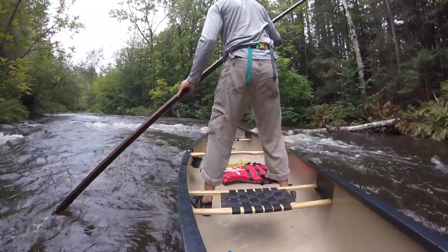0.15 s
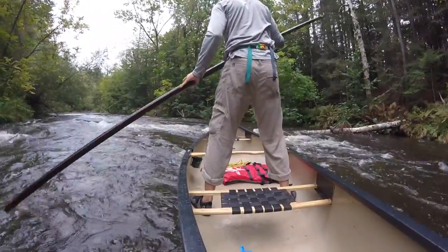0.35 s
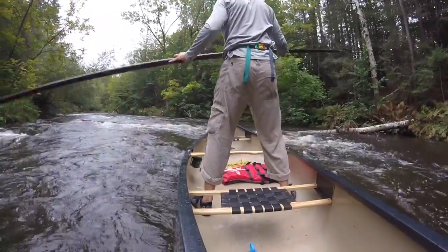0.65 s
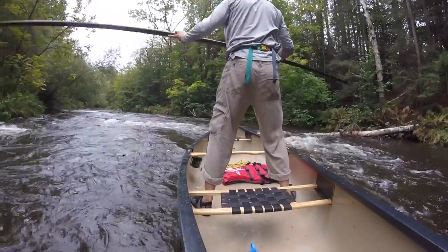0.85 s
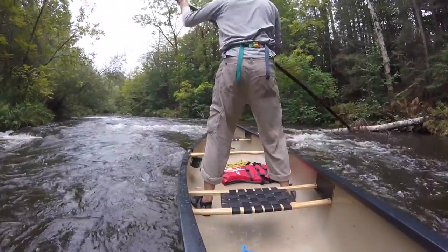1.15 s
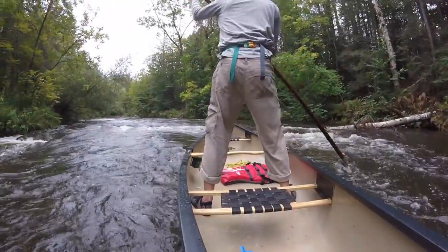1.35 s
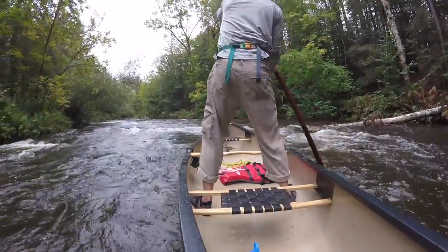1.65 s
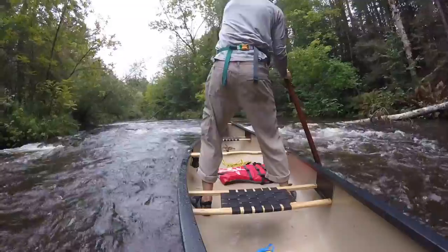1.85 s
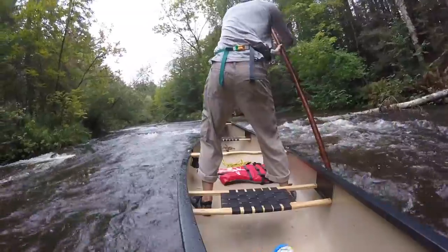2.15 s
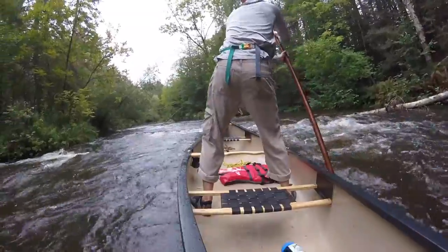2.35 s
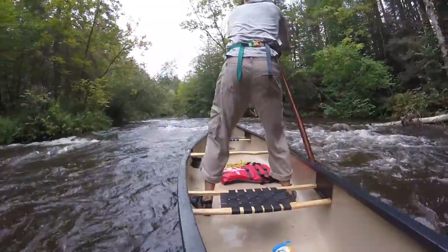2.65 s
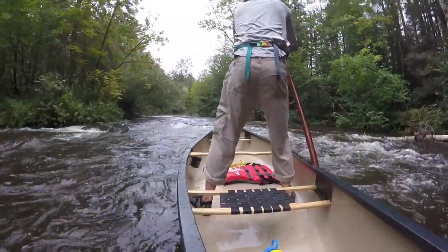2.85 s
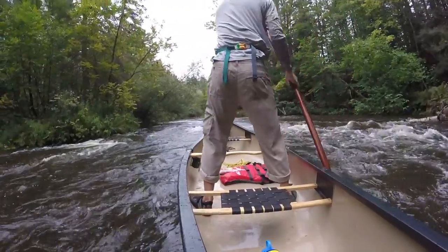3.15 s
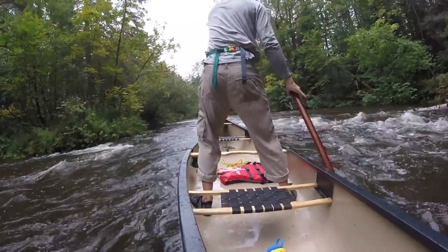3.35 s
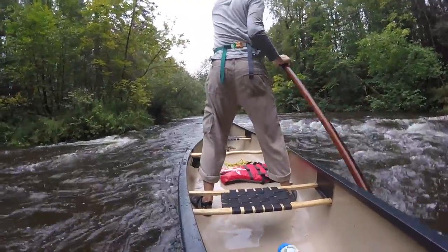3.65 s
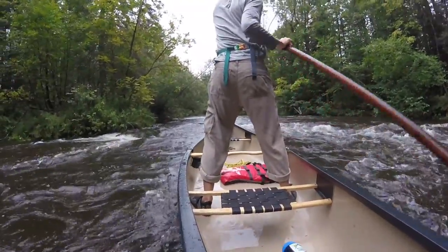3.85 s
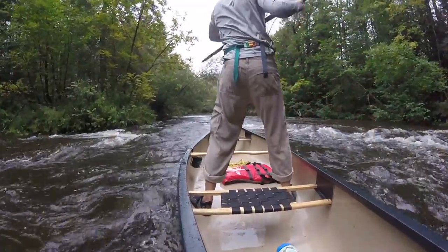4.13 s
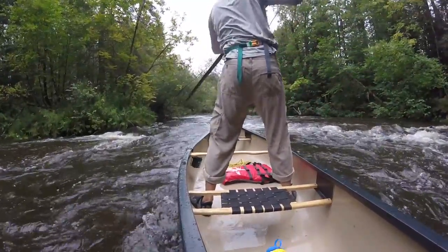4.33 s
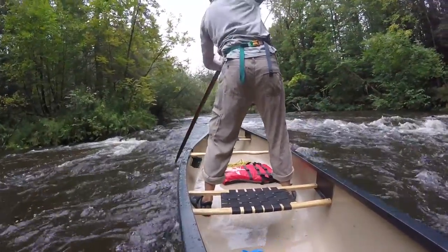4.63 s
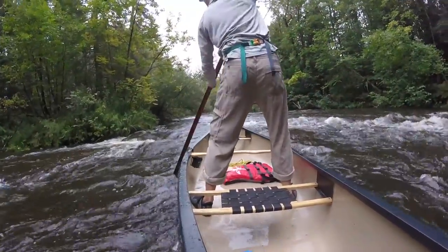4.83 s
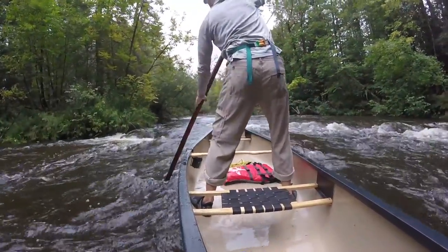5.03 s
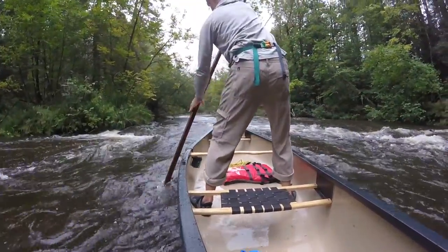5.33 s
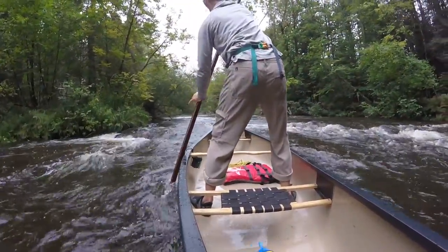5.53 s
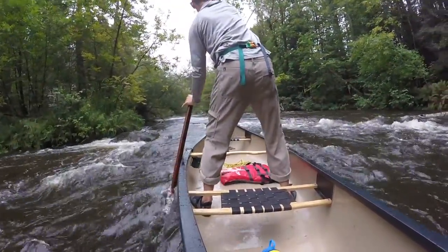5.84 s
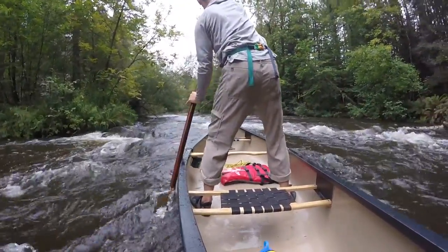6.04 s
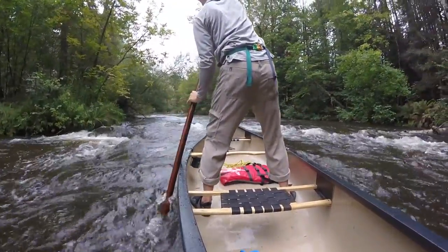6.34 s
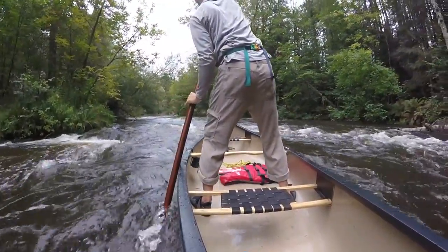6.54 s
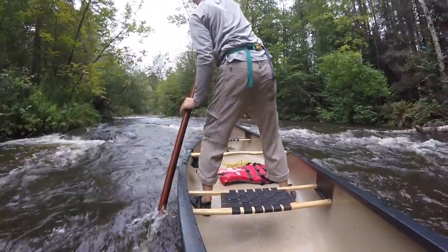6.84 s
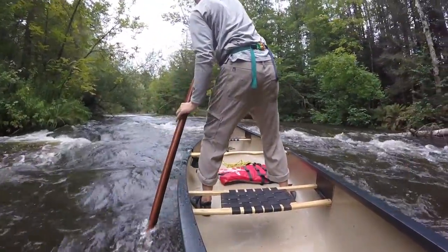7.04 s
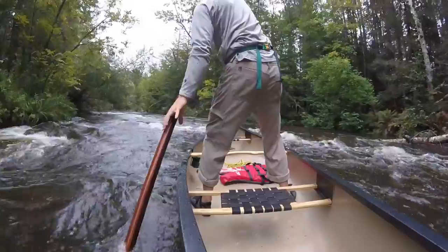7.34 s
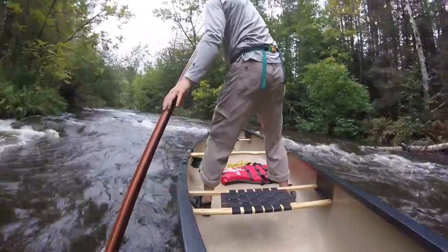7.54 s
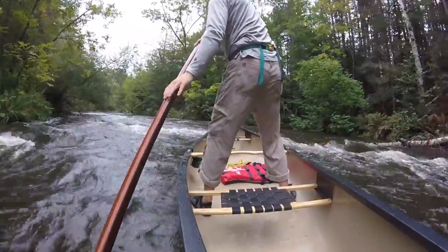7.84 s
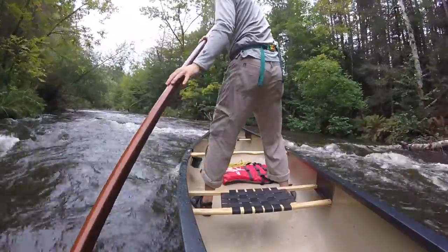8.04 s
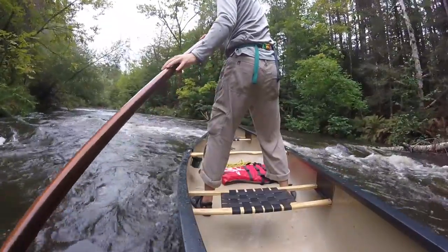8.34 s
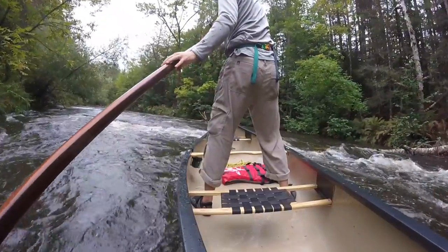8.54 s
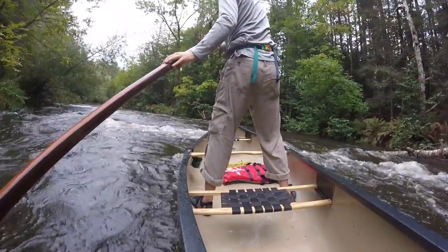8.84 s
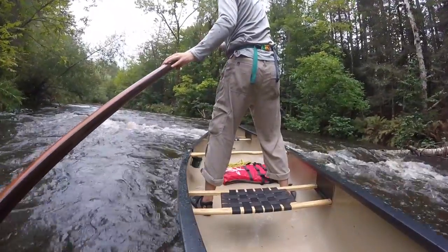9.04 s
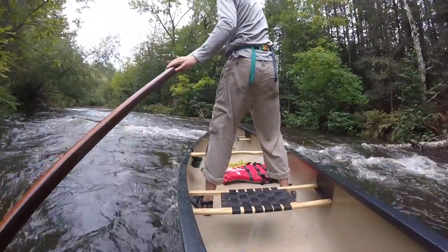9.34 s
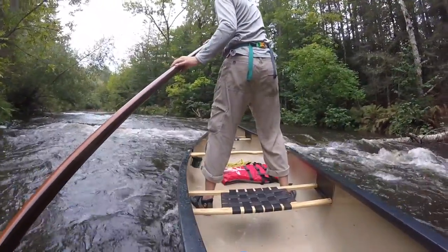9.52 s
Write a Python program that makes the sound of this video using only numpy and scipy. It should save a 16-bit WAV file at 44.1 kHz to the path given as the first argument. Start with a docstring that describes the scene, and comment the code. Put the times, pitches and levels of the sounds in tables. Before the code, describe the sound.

A close, muffled sound from a cased microphone mounted on a canoe in small rapids. Throughout, white water churns with midrange gurgle and fizzy spray, over a low wavering shudder, wind rumble and soft hull drumming. From 0 to 2 s there are drips and gentle wave slaps, with a dull boom near 1.3. At 2.0 the pole gives a hollow wooden tock, then scrapes at 2.3. At 2.7 a loud hull slam rings and bumps on with clacks. Another bang comes at 3.4, a smaller one at 3.6 with a deep air thump. The heaviest booming thud lands at 4.8, followed by lesser bumps at 5.2, 5.6, 6.0 and 6.4, with a few gulps and a knock at 6.1. Slaps, faint knocks and scrapes follow around 6.8 to 7.5. From 7.9 to 9.7 the rush swells again, with gulping bubbles, drips and wash slapping the side.

```python
"""Canoe poled up small rapids

Heard from inside a waterproof case fixed to the boat. Filtered noise and bubble swarms make the water;
damped modes make the hull slams, rebounds and pole knocks, scrapes and clacks. Waves slap, air gulps,
drops patter, noise rumbles as wind and a wavering low sine is the shaking mount.
A peak limiter ducks the river after hard slams."""
import sys
import numpy as np
from scipy import signal
from scipy.fft import rfft, irfft, next_fast_len
from scipy.io import wavfile
from scipy.ndimage import uniform_filter1d, minimum_filter1d

SR = 44100
rng = np.random.default_rng(int(sys.argv[2]) if len(sys.argv) > 2 else 0)


def waveform_to_disk(signal):
    """Save audio, clipped to [-1, 1], as 16-bit WAV at the path in sys.argv[1]."""
    frames = np.transpose(np.atleast_2d(signal))
    scaled = np.clip(frames, -1, 1) * 32767
    samples = np.round(scaled).astype(np.int16)
    wavfile.write(sys.argv[1], SR, samples)


N = 426888
TIME = np.arange(N) / SR


def amp(db):
    """Decibels to gain."""
    return 10 ** (np.asarray(db) / 20)


def unit(x):
    """Scales to rms 1."""
    return x / np.sqrt(np.mean(x ** 2) + 1e-20)


def peaked(x):
    """Scales to peak 1."""
    return x / (abs(x).max() + 1e-20)


def follow(rows, axis):
    """One dB column of a curve as a gain for every sample."""
    columns = np.transpose(rows)
    return amp(np.interp(TIME, columns[0], columns[axis]))


def colour(x, points):
    """Filters by a spectrum of (f/Hz, level/dB) points; beyond its ends it falls 20 dB per octave."""
    size = next_fast_len(len(x) + 4096)
    octave = np.log2(np.fft.rfftfreq(size, 1 / SR) + 1)
    hz, db = np.transpose(points)
    outside = abs(octave - np.clip(octave, np.log2(hz[0]), np.log2(hz[-1])))
    gain = amp(np.interp(octave, np.log2(hz), db) - 20 * outside)
    return irfft(rfft(x, size) * gain, size)[:len(x)]


def drift(per_s):
    """Smooth random curve of rms 1 that changes about per_s times a second."""
    hz = np.fft.rfftfreq(N // 64, 64 / SR)
    slow = irfft(rfft(rng.standard_normal(N // 64)) / (1 + (hz / per_s) ** 2))
    return unit(np.interp(TIME, np.linspace(0, TIME[-1], len(slow)), slow))


def add(mix, s, sound):
    """Mixes a sound in at time s."""
    part = mix[max(round(s * SR), 0):][:len(sound)]
    part += sound[:len(part)]


def swell(t, rise_s):
    """Rises to 1 in rise_s and dies away more slowly."""
    return t / rise_s * np.exp(1 - t / rise_s)


def patchy(patch_db, size):
    """Noise that swells in random patches of time and pitch, size = (bins, frames)."""
    z = signal.stft(rng.standard_normal(N), nperseg=512)[2]
    field = uniform_filter1d(rng.standard_normal(z.shape), size[0], axis=0)
    field = uniform_filter1d(field, size[1], axis=1)
    return unit(signal.istft(z * amp(patch_db * unit(field)), nperseg=512)[1][:N])


def bubble(hz, cycles, rise):
    """A bubble rings, decaying to 1/e in some cycles, rising in pitch as it nears the surface."""
    age = np.arange(int(5 * cycles * SR / hz) + 2) * hz / (SR * cycles)
    tone = np.sin(2 * np.pi * cycles * age * (1 + rise * age))
    return tone * np.exp(-age) * (1 - np.exp(-10 * age))


def bubbles(low_hz, high_hz, per_s, cycles, spread_db, count):
    """A swarm of bubbles of count sizes; most are faint, a few are loud."""
    out = np.zeros(N)
    for hz in np.linspace(low_hz, high_hz, count):
        blip = bubble(hz, cycles, 0.018)
        births = rng.random((4000, 2))[:int(per_s * TIME[-1] / count)]
        level_db = spread_db * np.minimum(-np.log(births[:, 1] + 1e-9), 4.5)
        sizes = amp(level_db) / np.linalg.norm(blip)
        places = (births[:, :1] * N).astype(int) + np.arange(len(blip))
        out += np.bincount(places.ravel(), (sizes[:, None] * blip).ravel(), N)[:N]
    return unit(out)


# hull modes before blow weighting and damping: f/Hz, level/dB, t60/s
HULL_MODES = [(131.8, -1, 0.72), (157.2, 8, 0.28), (187, 0.5, 0.64), (280, -30, 0.11), (298.7, -10, 0.16),
              (324.2, -3, 0.11), (357.4, 2, 0.079), (404, -7.5, 0.028), (475, -18.5, 0.029),
              (519, -6, 0.11), (636, -14, 0.092), (771, -11, 0.041), (920, -16.5, 0.039)]


def ring(modes, bright_hz, width):
    """The modes of a struck body; a blow favours those within about width octaves of its brightness."""
    t = np.arange(SR // 2) / SR
    out = np.zeros(len(t))
    for hz, db, t60 in modes:
        share = 1 / (1 + (np.log2(hz / bright_hz) / width) ** 2)
        build = 1 - np.exp(-t * hz / 1.2)  # about a cycle to build: low modes speak last
        out += share * build * amp(db - 60 * t / t60) * np.sin(2 * np.pi * hz * t)
    return out


def crack(t):
    """The brief gritty noise at the point of contact."""
    spectrum = [(300, -3.5), (700, 8), (1300, -9.0), (2000, -16.5),
                (2900, -11.5), (3700, -20.5), (5000, -12.0), (7000, -37.0)]
    grit = unit(colour(rng.standard_normal(len(t)), spectrum))
    return grit * np.exp(-t / 0.021) * (1 - np.exp(-t / 0.00097))


# white water, before trims: t/s, churn level/dB, spray level/dB
RIVER_LEVELS = [(0, -39.5, -49), (.45, -40, -48), (1.1, -40.5, -50), (1.55, -42, -46.5), (1.92, -39, -43.5),
                (2.4, -42.5, -49), (2.62, -37.5, -44), (3.15, -43, -50), (3.34, -38, -45.5),
                (4.0, -44.5, -50), (4.7, -41.5, -49.5), (5.5, -44.5, -53), (6.25, -43, -53.5),
                (7.25, -40, -49.5), (7.95, -38.5, -44), (8.45, -38, -46.5), (8.85, -36.5, -43.5),
                (9.68, -39.5, -48)]
# wash along the side: t/s, level/dB
WASH_LEVELS = [(0, -59), (2.9, -61.5), (3.33, -49.5), (3.5, -70), (7.5, -65), (7.95, -50), (8.4, -64),
               (8.75, -55), (9.08, -46.5), (9.3, -59), (9.45, -45), (9.68, -63)]
# spectra as heard inside the case: f/Hz, level/dB (per Hz)
CHURN_SPECTRUM = [(120, -38.5), (210, -10), (217, -7), (274, -5), (357, -2.5), (399, -3.5), (456, -6.5),
                  (526, -0.5), (606, -4.5), (699, -3.5), (840, -6.5), (999, -3), (1400, -18.5), (2400, -35),
                  (3120, -35.5), (5280, -120)]
SPRAY_SPECTRUM = [(1180, -28), (2000, -6), (2380, -8.5), (2610, 1), (2930, 3), (3750, -10.5), (4370, -0.5),
                  (5010, 2), (5270, 0.5), (5890, -14), (7000, -27), (9100, -49), (15400, -120)]
SIZZLE_SPECTRUM = [(4500, -36), (6500, 2.5), (7600, 2), (8300, -1.5), (9600, -2.5), (10300, -9.5),
                   (11500, -12), (12700, -9), (14000, -25)]
CHURN_TRIM_DB, SPRAY_TRIM_DB = 1.0, -1.0


def river():
    """Churning white water with gurgles, the spray of bursting foam, and wash breaking along the side."""
    gurgle = bubbles(287.4, 2357, per_s=500, cycles=7.8, spread_db=2.5, count=40)
    body = patchy(patch_db=-0.2, size=(5, 8)) + amp(-13.0) * gurgle
    churn = unit(colour(body, CHURN_SPECTRUM)) * amp(0.38 * drift(5.7))
    foam = bubbles(2120, 13130, per_s=2200, cycles=6.5, spread_db=3.5, count=40)
    fizz = (patchy(patch_db=0.7, size=(12, 6)) + amp(-5.0) * foam) * amp(1.0 * drift(7.2))
    spray = unit(colour(fizz, SPRAY_SPECTRUM)) + amp(-18.0) * unit(colour(fizz, SIZZLE_SPECTRUM))
    wash_spectrum = [(1100, 7.0), (1500, 0.0), (1900, 5.0), (2400, -10.0), (3200, -12.0)]
    wash = unit(colour(patchy(patch_db=3.0, size=(10, 4)), wash_spectrum))
    out = amp(CHURN_TRIM_DB) * churn * follow(RIVER_LEVELS, axis=1)
    out += amp(SPRAY_TRIM_DB) * spray * follow(RIVER_LEVELS, axis=2)
    return out + wash * follow(WASH_LEVELS, axis=1)


# buffeting, before trims: t/s, hull drumming level/dB, wind level/dB
BUFFET_LEVELS = [(0, -35, -34), (.65, -40.5, -42), (1.0, -37.5, -45), (1.75, -39, -46.5),
                 (2.15, -26.5, -33.5), (2.45, -35.5, -39.5), (2.9, -29, -30), (3.2, -37.5, -44.5),
                 (4.05, -39.5, -45.5), (4.4, -28, -32.5), (4.75, -29.5, -35), (5.4, -35, -34.5),
                 (6.65, -32, -41), (7.05, -38, -41), (7.45, -35.5, -47.5), (8.4, -41.5, -45),
                 (8.9, -32, -45), (9.68, -31.5, -45)]
DRUMMING_TRIM_DB, WIND_TRIM_DB = -2.5, 3.5


def drumming():
    """The current keeps the lowest modes of the hull booming, in uneven swells."""
    boom = signal.oaconvolve(rng.standard_normal(N), ring(HULL_MODES[:3], 120, width=0.97))[:N]
    swells = follow(BUFFET_LEVELS, axis=1) * amp(1.6 * drift(3.6))
    return amp(DRUMMING_TRIM_DB) * unit(boom) * swells


# wind rumble inside the case: f/Hz, level/dB (per Hz)
WIND_SPECTRUM = [(10, -14), (22, 2), (32, -7.5), (45, -3.5), (70, -2), (90, -3.5), (110, -32), (220, -28.5),
                 (500, -36.5)]
SWAY_HZ, SWAY_DB = 15, -27.5  # mean rate, steady sway
KICK_DB, KICK_DECAY_S = -24.5, 0.32  # kick relative to slam


def wind():
    """Lumpy rumble on the case, and the slow shudder of its springy mount, which every slam sets swinging."""
    rumble = unit(colour(rng.standard_normal(N), WIND_SPECTRUM))
    shudder = np.sin(2 * np.pi * np.cumsum(SWAY_HZ + 2.46 * drift(3.43)) / SR)
    kicks = np.zeros(N)
    for s, peak_db, *_ in SLAMS:
        onset = np.clip((TIME - s) * SWAY_HZ, 0, 1)
        kicks += amp(peak_db) * np.exp(-abs(TIME - s) / KICK_DECAY_S) * onset
    sway = unit(shudder) * (amp(SWAY_DB) + amp(KICK_DB) * kicks)
    return amp(WIND_TRIM_DB) * rumble * follow(BUFFET_LEVELS, axis=2) + sway


# gusts on the case: t/s, peak level/dB, rise/s
GUST_EVENTS = [(3.655, -4.5, 0.034), (4.46, -27, 0.01)]
# gust spectrum: f/Hz, level/dB (per Hz)
GUST_SPECTRUM = [(14, 1), (30, -13), (50, -11), (80, -29), (130, -38)]


def gust(peak_db, rise_s):
    """A lump of air hits the case with a deep, toneless thump."""
    t = np.arange(SR // 2) / SR
    return amp(peak_db) * peaked(colour(rng.standard_normal(len(t)), GUST_SPECTRUM) * swell(t, rise_s))


# nearest drops: t/s, peak level/dB, f/Hz, bubble level/dB re spatter, decay/cycles
DROP_EVENTS = [(.294, -33, 4650, 12, 9), (.303, -33.5, 4600, 8, 8), (.392, -22.5, 4750, 10, 9),
               (.483, -32.5, 2800, 4, 7), (2.673, -25, 2570, -8, 8), (3.183, -34, 1920, -9, 6),
               (3.371, -31, 4850, 12, 10), (3.607, -25.5, 5000, 13, 10), (3.656, -25.5, 1970, -8, 6),
               (4.232, -32.5, 1840, -2, 7), (4.659, -38, 1700, 2, 7.9), (5.329, -39.5, 6320, 10, 12),
               (5.378, -33.5, 2580, 15, 19), (5.411, -41, 2800, 10, 18), (7.82, -27, 3930, -16, 10),
               (8.168, -34, 1930, -11, 10), (8.208, -30.5, 3580, -7, 8.9), (8.293, -29, 5000, -7, 10)]


def drop(peak_db, hz, ring_db, cycles=9.8):
    """A near drop: a short spatter and the bubble that it traps."""
    t = np.arange(SR // 10) / SR
    spectrum = [(hz / 2, -14), (hz, 0), (hz * 1.16, -7), (hz * 2, -28)]
    splash = colour(rng.standard_normal(len(t)), spectrum)
    sound = peaked(splash * np.exp(-t / .0045) * (1 - np.exp(-t / .001)))
    add(sound, .001, amp(ring_db) * bubble(hz, cycles, 0.0013))
    return amp(peak_db) * peaked(sound)


DROP_SPREAD_DB, DROP_SPREAD_OCTAVES = 3, 0.46  # either way


def shower(start_s, length_s, peak_db, hz, ring_db, fade_db, count):
    """Count drops of chance size and pitch fall at uneven times; level shifts by fade_db to the end."""
    out = np.zeros(N)
    for k, (late, size, pitch) in enumerate(rng.random((count, 3))):
        age = (k + late) / count
        level_db = peak_db + fade_db * age + DROP_SPREAD_DB * (2 * size - 1)
        drop_hz = hz * 2 ** (DROP_SPREAD_OCTAVES * (2 * pitch - 1))
        add(out, start_s + length_s * age, drop(level_db, drop_hz, ring_db))
    return out


PATTER_HZ, PATTER_DB, PATTER_RING_DB = 4280, -52, -3
SHOWER_HZ, SHOWER_DB, SHOWER_S, SHOWER_RING_DB = 1780, -48, .3, -22  # SHOWER_DB re slam


def spatter():
    """Stray drops patter throughout, weakening, and each slam throws up a short shower."""
    out = shower(0, TIME[-1], PATTER_DB, PATTER_HZ, PATTER_RING_DB, fade_db=-13, count=12)
    for s, peak_db, *_ in SLAMS:
        out += shower(s, SHOWER_S, peak_db + SHOWER_DB, SHOWER_HZ, SHOWER_RING_DB, fade_db=-28.0, count=7)
    return out


# air pockets beside the boat: t/s, peak level/dB, centre f/Hz, span of bubble starts/s
GULP_EVENTS = [(2.668, -29, 983, 0.013), (5.319, -30, 960, .016), (5.334, -27.5, 1020, 0.0092),
               (5.408, -32.5, 1050, 0.016), (5.478, -37, 728, 0.0091), (7.183, -37.5, 1430, 0.014),
               (7.940, -28, 705, 0.035), (7.970, -30, 1070, .015), (8.130, -31, 720, 0.0132),
               (8.183, -27, 550, 0.044), (8.345, -32, 400, 0.017), (8.760, -31, 406, 0.043)]
GULP_OCTAVES, GULP_CYCLES, GULP_SPREAD_DB = 0.36, 2, 5.5


def gulp(peak_db, hz, length_s, count=7):
    """A pocket of air breaks into count bubbles, one after another."""
    sound = np.zeros(SR // 5)
    for k, (late, size, pitch) in enumerate(rng.random((count, 3))):
        blip = bubble(hz * 2 ** (GULP_OCTAVES * (2 * pitch - 1)), GULP_CYCLES, 0.038)
        add(sound, length_s * (k + late) / count, amp(-GULP_SPREAD_DB * size) * blip)
    return amp(peak_db) * peaked(sound)


def surge(peak_db, bright_hz, decay_s):
    """Water presses on the hull in a short surge of noise that rings the modes and sloshes."""
    age = np.arange(SR // 3) / (SR * decay_s)
    push = np.exp(-age) * (1 - np.exp(-3 * age))
    water = rng.standard_normal(len(age))
    boom = unit(signal.fftconvolve(water * push, ring(HULL_MODES, bright_hz, width=0.42))[:len(age)])
    slosh = unit(colour(water, [(bright_hz / 2, -7), (bright_hz, 0), (bright_hz * 2, -16)]) * push)
    return amp(peak_db) * peaked(boom + amp(-1.5) * slosh)


# waves on the hull: t/s, slosh peak level/dB, slosh brightness f/Hz, boom lag/s, boom peak level/dB,
# boom rise/s, rumble level/dB
SLAP_EVENTS = [(.1, -51, 600, .022, -22.5, .019, -48), (.465, -25.5, 760, .022, -40, .028, -52),
               (.526, -19.5, 384, .022, -20.5, 0.016, -30.5), (1.315, -32, 332, .026, -15, .022, -33),
               (6.812, -28.5, 322, .036, -20.5, 0.013, -41), (7.322, -24.5, 340, .002, -19.5, .008, -36),
               (8.612, -34, 302, 0.0076, -28.5, 0.025, -30.5), (9.082, -25.5, 700, .022, -40, 0.015, -36),
               (9.435, -22, 680, .022, -25, 0.027, -43)]
# loaded boat shuddering under a wave: f/Hz, level/dB (per Hz)
RUMBLE_SPECTRUM = [(30, -1), (55, -8.5), (85, 1.5), (115, -19), (190, -7), (240, -17), (350, -26),
                   (600, -36)]
SLOSH_S, BOOM_HZ, RUMBLE_RISE_S = 0.017, 152, 0.046


def slap(slosh_db, bright_hz, lag_s, boom_db, boom_rise_s, rumble_db):
    """A wave sloshes against the side, its weight swells into a boom on the hull, and the boat rumbles on."""
    t = np.arange(SR // 2) / SR
    weight = rng.standard_normal(len(t)) * swell(t, boom_rise_s)
    body = ring(HULL_MODES[:3], BOOM_HZ, width=0.23) * np.exp(-t / 0.028)
    boom = signal.fftconvolve(weight, body)[:len(t)]
    rumble = unit(colour(rng.standard_normal(len(t)), RUMBLE_SPECTRUM)) * swell(t, RUMBLE_RISE_S)
    sound = np.zeros(len(t))
    add(sound, 0, surge(slosh_db, bright_hz, SLOSH_S))
    add(sound, lag_s, amp(boom_db) * peaked(boom) + amp(rumble_db) * rumble)
    return sound


# wood chattering on the boat after a jolt: t/s, peak level/dB, brightness f/Hz
CLACK_EVENTS = [(2.760, -24, 1960), (2.785, -20.5, 1150), (2.834, -27, 1800), (2.858, -20, 795),
                (2.946, -27, 1200), (3.450, -18, 1400), (3.507, -18, 700), (3.543, -23, 700),
                (3.683, -22, 850), (3.729, -29, 1410), (4.826, -21, 1600), (4.843, -16, 1050),
                (4.850, -26, 2300), (4.881, -25, 1400), (5.275, -26, 680), (6.139, -29, 1500)]
CLACK_DECAY_S, CLACK_RING_DB = 0.0036, -1.5  # ring re click


def clack(peak_db, bright_hz):
    """A dry clack of wood: a gritty click and a quickly damped ring of the pole."""
    wood = ring(POLE_MODES, bright_hz, width=1.0)
    t = np.arange(len(wood)) / SR
    spectrum = [(bright_hz / 2, -5), (bright_hz, 0), (bright_hz * 2, -12), (bright_hz * 4, -29)]
    click = colour(rng.standard_normal(len(t)), spectrum)
    click *= np.exp(-t / CLACK_DECAY_S) * (1 - np.exp(-t / 0.0004))
    damped_wood = peaked(wood * np.exp(-t / 0.0055))
    return amp(peak_db) * peaked(peaked(click) + amp(CLACK_RING_DB) * damped_wood)


# pole grinding along the side: t/s, peak level/dB, brightness f/Hz, length/s
SCRAPE_EVENTS = [(2.268, -20.5, 660, .046), (2.356, -32, 800, .045), (4.645, -31, 540, 0.031),
                 (7.2, -31, 530, 0.052), (7.345, -32, 527, 0.042)]
SLIP_SPREAD_DB, SCRAPE_OCTAVES, SCRAPE_GRIT_DB = 16.5, 0.33, 5  # grit re ring


def scrape(peak_db, bright_hz, length_s, count=8):
    """The pole sticks and slips count times; each slip rasps and sets the wood ringing."""
    wood = ring(POLE_MODES, bright_hz, SCRAPE_OCTAVES)
    t = np.arange(len(wood)) / SR
    sound = np.zeros(len(t))
    for k, (late, size) in enumerate(rng.random((count, 2))):
        rasp = colour(rng.standard_normal(len(t)), [(270, -6), (600, -6), (1150, -6), (1500, -23)])
        rasp = rasp * swell(t, 0.004)
        slip = peaked(signal.fftconvolve(rasp, wood)[:len(t)]) + amp(SCRAPE_GRIT_DB) * peaked(rasp)
        add(sound, length_s * (k + late / 2) / count, amp(-SLIP_SPREAD_DB * size) * slip)
    return amp(peak_db) * peaked(sound)


# pole on rock or gunwale: t/s, ring peak level/dB before damping, brightness f/Hz, ring width/octaves,
# crack level/dB re ring, bounce level/dB re ring, grip damping/s
KNOCK_EVENTS = [(2.004, -13.5, 675, 0.47, -10, -12, 0.18), (6.122, -20.5, 560, .35, -19, -12, 0.013),
                (7.141, -25, 544, 0.1, -26, -30, 0.033), (7.272, -28, 563, .2, -13, -20, 0.025)]
# wooden pole modes before weighting and damping: f/Hz, level/dB, t60/s
POLE_MODES = [(389, 9, 0.16), (542, 4, 0.29), (625, 5.5, 0.045), (690, 3, 0.027), (718, -3, 0.081),
              (1015, 1, 0.12), (1200, -14.5, 0.18)]
BOUNCE_S, BOUNCE_HZ, BOUNCE_OCTAVES = 0.0226, 520, 0.53
POLE_HULL_DB, POLE_HULL_RISE_S = -5, 0.059  # hull hum re knock


def knock(peak_db, bright_hz, width, crack_db, bounce_db, damp_s):
    """The pole lands with a hollow wooden tock, bounces once and sets the hull humming."""
    wood = peaked(ring(POLE_MODES, bright_hz, width))
    t = np.arange(len(wood)) / SR
    sound = wood + amp(crack_db) * crack(t)
    add(sound, BOUNCE_S, amp(bounce_db) * peaked(ring(POLE_MODES, BOUNCE_HZ, BOUNCE_OCTAVES)))
    hull = peaked(ring(HULL_MODES[:3], 168, width=0.11) * swell(t, POLE_HULL_RISE_S))
    return amp(peak_db) * (sound * np.exp(-t / damp_s) + amp(POLE_HULL_DB) * hull)


GIVE_S = 0.0013  # hull gives before it rings in full


def blow(peak_db, bright_hz, width, thud_db, crack_db, damp_s):
    """A blow rings the hull and flexes the whole loaded boat with a rattling thud."""
    boom = ring(HULL_MODES, bright_hz, width)
    t = np.arange(len(boom)) / SR
    boom = peaked(boom * (1 - np.exp(-t / GIVE_S)) * np.exp(-t / damp_s))
    flex = np.sin(2 * np.pi * 70 * t) * np.exp(-t / .028)
    spectrum = [(35, 17.5), (80, 13.0), (200, -18.0), (400, -14.0), (700, -32.5), (1200, -40.5)]
    rattle = unit(colour(rng.standard_normal(len(t)), spectrum)) * np.exp(-t / 0.041)
    thud = (flex + amp(9.5) * rattle) * (1 - np.exp(-t / 0.0094))
    return amp(peak_db) * (boom + amp(thud_db) * thud + amp(crack_db) * crack(t))


# hull bumping again: t/s, ring peak level/dB, brightness f/Hz, thud level/dB re ring
REBOUND_EVENTS = [(1.425, -26, 140, -13), (1.485, -35, 150, -4), (2.300, -23.5, 173, -4),
                  (2.331, -20.5, 140, -17), (2.738, -4, 169, -16), (2.779, -5.5, 238, -8.5),
                  (2.814, -7, 182, -21), (2.868, -16, 181, -8), (3.449, -18, 200, -19),
                  (3.469, -13, 170, -16), (3.494, -10, 166, -5), (3.622, -16.5, 171, -1),
                  (3.682, -15.5, 260, -6.5), (3.712, -25, 168, -11), (4.843, -4.5, 190, -4),
                  (4.875, -10.5, 210, -2), (5.250, -17, 165, -16), (5.275, -19, 191, -3),
                  (5.320, -28, 149, 2), (5.619, -11.5, 161, -28), (5.659, -21.5, 200, -7),
                  (5.722, -27, 140, -1), (5.775, -29.5, 140, -3), (5.994, -11, 160, -14),
                  (6.135, -23.5, 165, -16), (6.19, -29, 165, -14), (6.425, -29, 160, -9),
                  (6.474, -27.5, 270, -8), (7.395, -21.5, 165, -16), (7.436, -23, 157, -14),
                  (7.472, -25, 160, -8)]
REBOUND_OCTAVES, REBOUND_CRACK_DB, REBOUND_DAMP_S = 0.42, -35, 0.079  # damped by water on the hull


def rebound(peak_db, bright_hz, thud_db):
    """A dull bump as the boat rocks back."""
    return blow(peak_db, bright_hz, REBOUND_OCTAVES, thud_db, REBOUND_CRACK_DB, REBOUND_DAMP_S)


# hull slams and bumps: t/s, ring peak level/dB, brightness f/Hz, ring width/octaves, thud level/dB re ring,
# crack level/dB re ring, second contact lag/s, second contact level/dB re first, water damping/s
SLAMS = [(2.698, 5, 340, 1.6, -13, -30, 0.0093, -7.5, 0.3),
         (3.423, 7, 557, 2.8, -16.5, -31.5, .0095, -13, 0.075),
         (3.591, -9.5, 338, 0.87, -11.5, -27, .0085, -1, 0.062),
         (4.813, 10, 180, 1.2, -16, -40, .0062, -4, 0.024),
         (5.223, -3.5, 270, .9, -16, -31, .016, -11, 0.067),
         (5.590, -10.5, 316, 0.69, -22.5, -41, .015, -17.5, 0.15),
         (5.969, 0.5, 344, 1.3, -20.5, -37, .00695, -12, 0.049),
         (6.390, -14.5, 247, 1.2, -17, -33, 0.0065, -9, .25)]


def slam(peak_db, bright_hz, width, thud_db, crack_db, lag_s, second_db, damp_s):
    """The hull lands in two contacts, one close upon the other."""
    sound = blow(peak_db, bright_hz, width, thud_db, crack_db, damp_s)
    add(sound, lag_s, blow(peak_db + second_db, bright_hz, width, thud_db, crack_db, damp_s))
    return sound


def scene():
    """River, hull drumming, wind and spatter, with every timed event mixed in."""
    mix = river() + drumming() + wind() + spatter()
    events = ((GUST_EVENTS, gust), (DROP_EVENTS, drop), (GULP_EVENTS, gulp), (SLAP_EVENTS, slap),
              (CLACK_EVENTS, clack), (SCRAPE_EVENTS, scrape), (KNOCK_EVENTS, knock),
              (REBOUND_EVENTS, rebound), (SLAMS, slam))
    for table, source in events:
        for s, *columns in table:
            add(mix, s, source(*columns))
    return mix[None]


EDGE_HZ = 14300


def record(dry):
    """A peak limiter clamps down at once and recovers slowly; then a lowpass limits the band."""
    ceiling_db, recovery_db_per_s = -6.3, 27
    over_db = np.maximum(20 * np.log10(abs(dry[0]) + 1e-9) - ceiling_db, 0)
    recovery_db = recovery_db_per_s * TIME
    held_db = np.maximum.accumulate(over_db + recovery_db) - recovery_db
    gain = uniform_filter1d(minimum_filter1d(amp(-held_db), size=130), size=130)
    lowpass = signal.firwin(301, EDGE_HZ, window=("kaiser", 9), fs=SR)
    return signal.oaconvolve(dry * gain, lowpass[None], "same")


dry = scene()
out = record(dry)
waveform_to_disk(out)
```